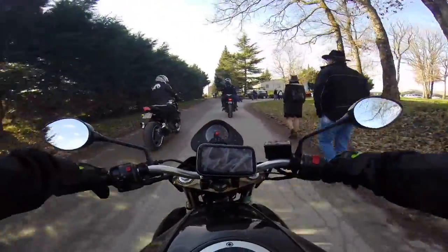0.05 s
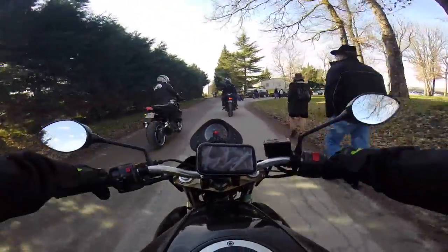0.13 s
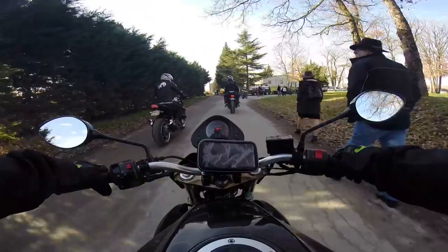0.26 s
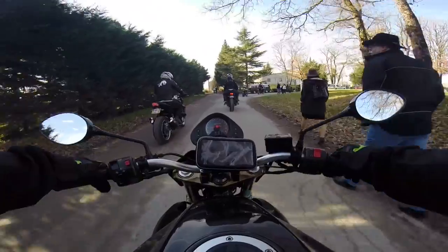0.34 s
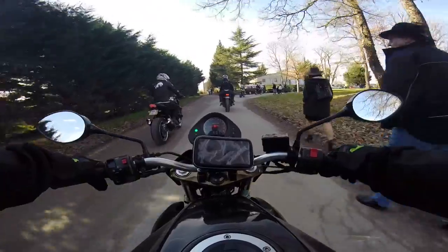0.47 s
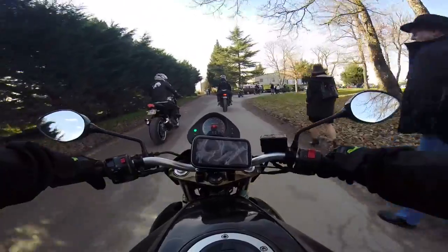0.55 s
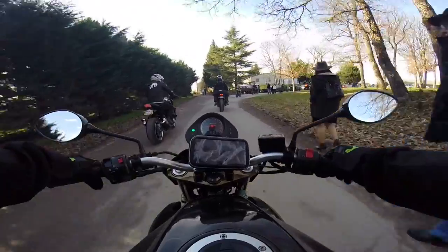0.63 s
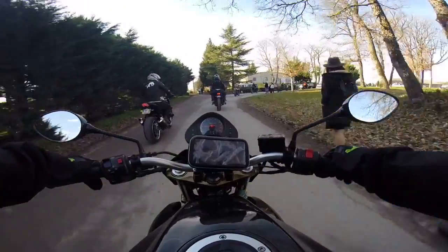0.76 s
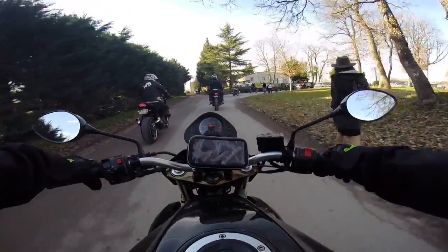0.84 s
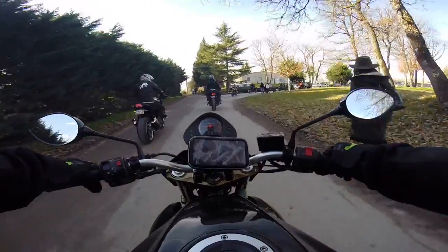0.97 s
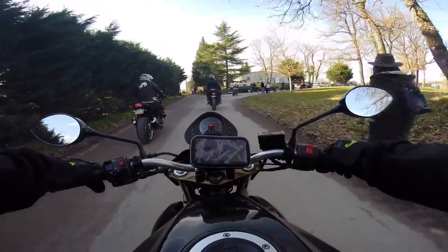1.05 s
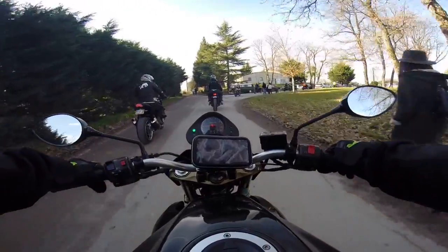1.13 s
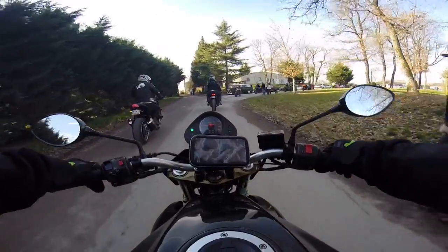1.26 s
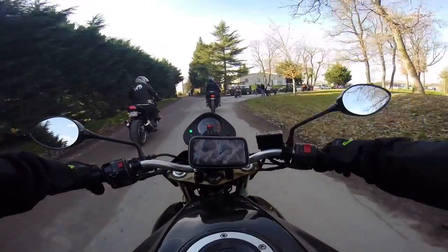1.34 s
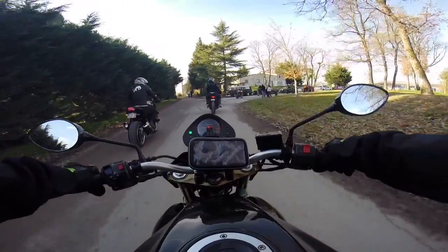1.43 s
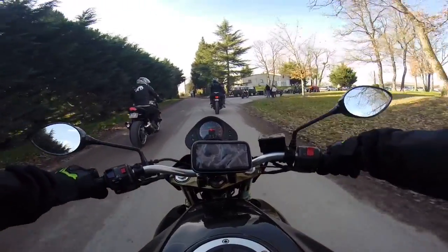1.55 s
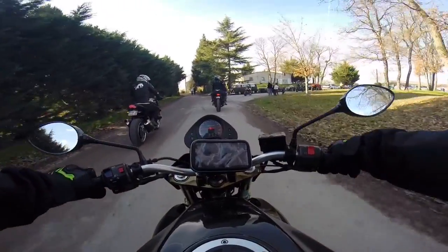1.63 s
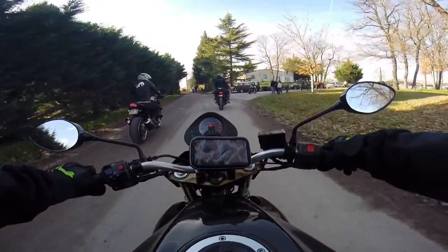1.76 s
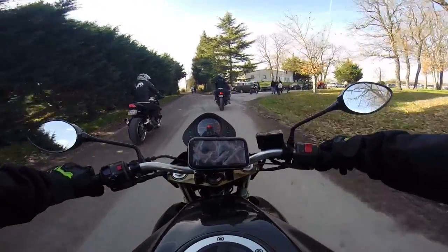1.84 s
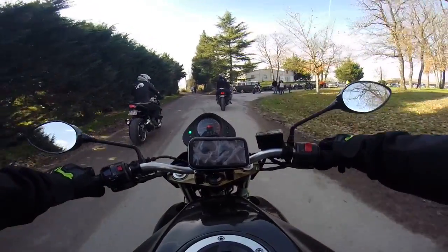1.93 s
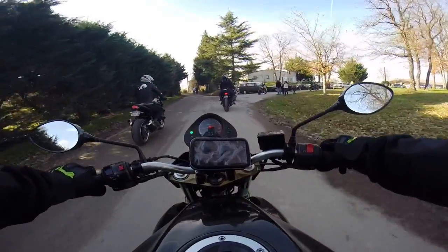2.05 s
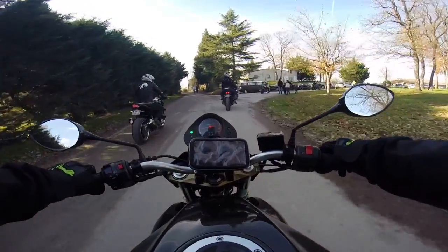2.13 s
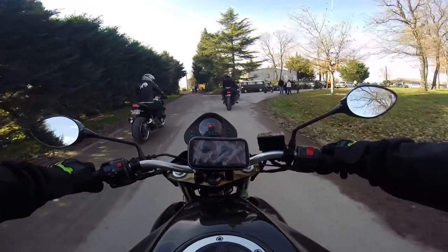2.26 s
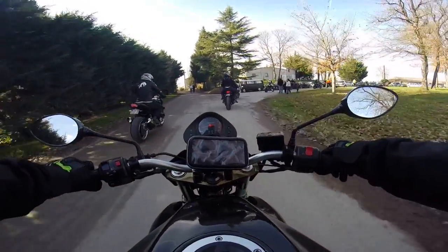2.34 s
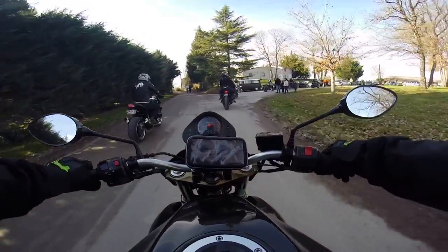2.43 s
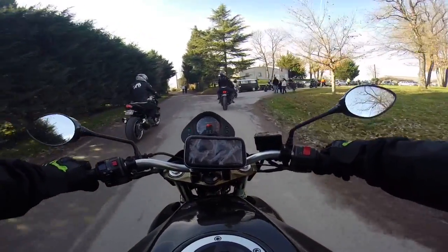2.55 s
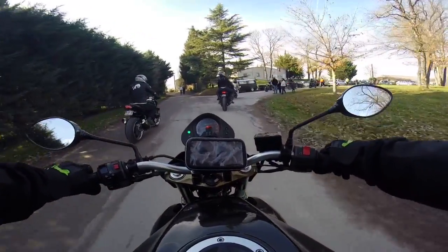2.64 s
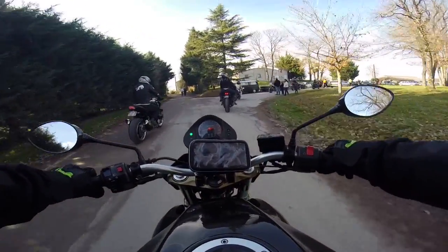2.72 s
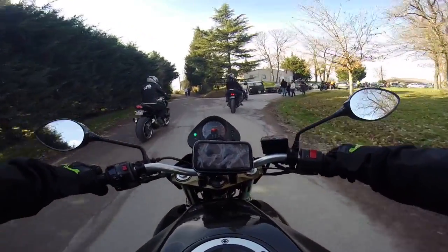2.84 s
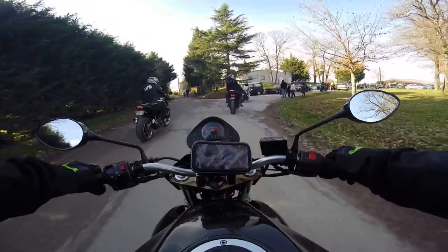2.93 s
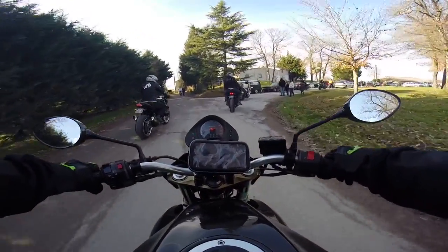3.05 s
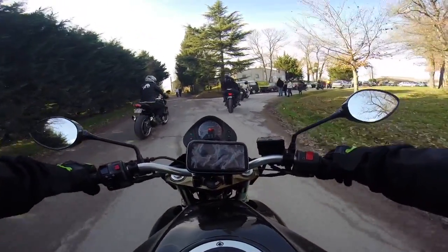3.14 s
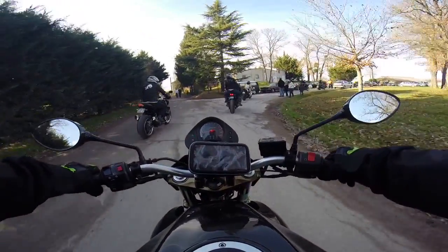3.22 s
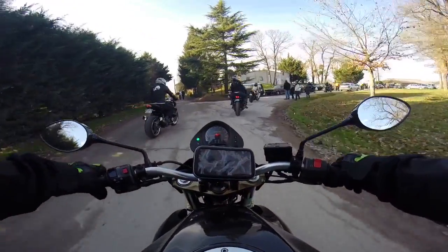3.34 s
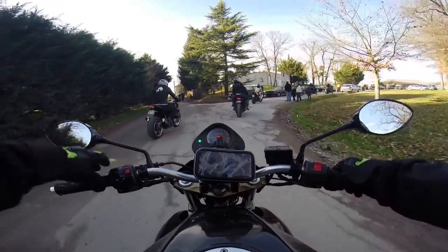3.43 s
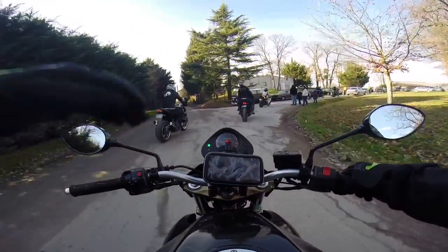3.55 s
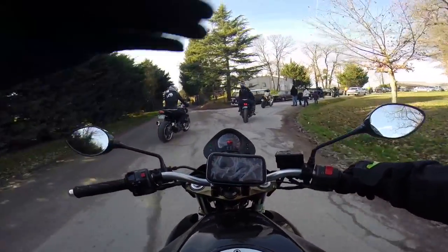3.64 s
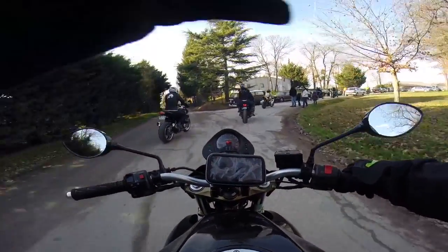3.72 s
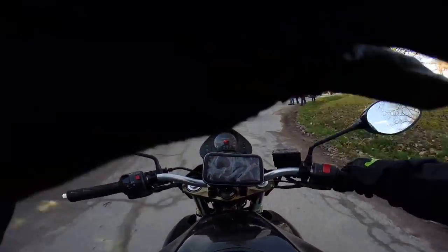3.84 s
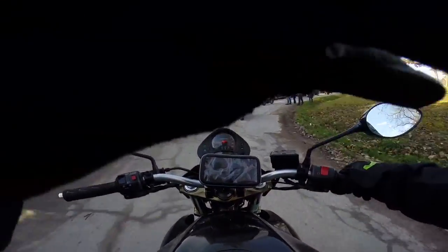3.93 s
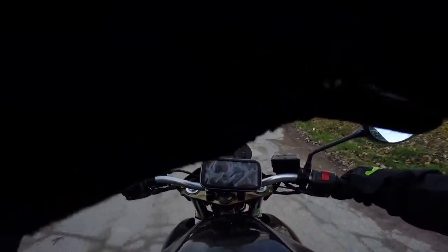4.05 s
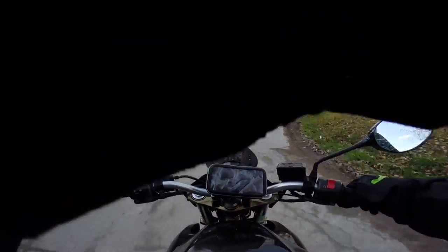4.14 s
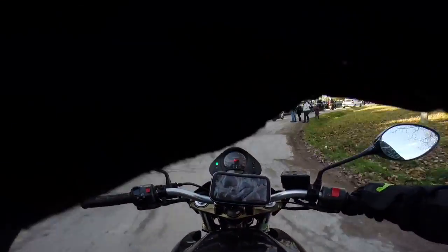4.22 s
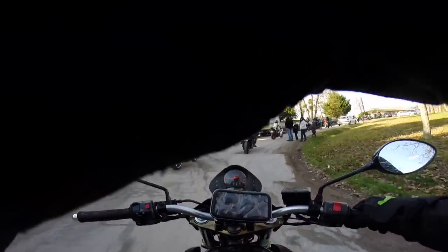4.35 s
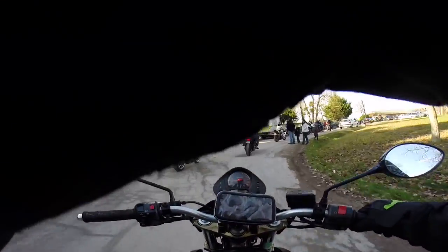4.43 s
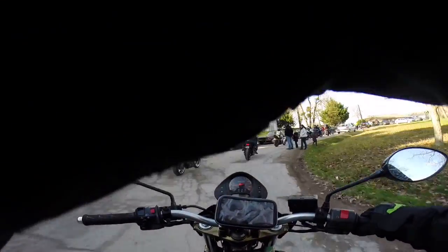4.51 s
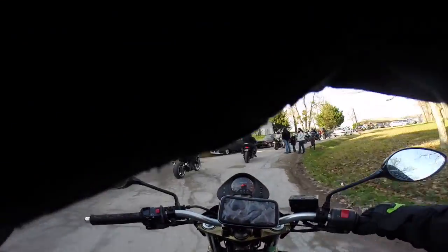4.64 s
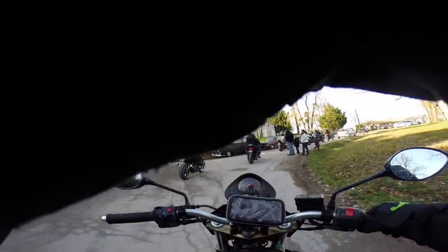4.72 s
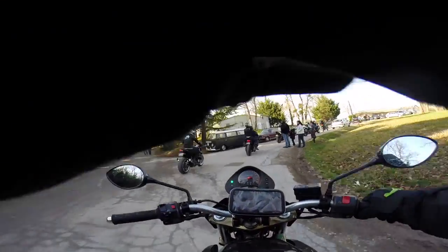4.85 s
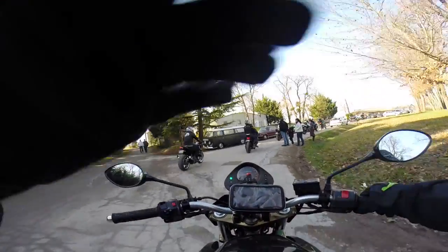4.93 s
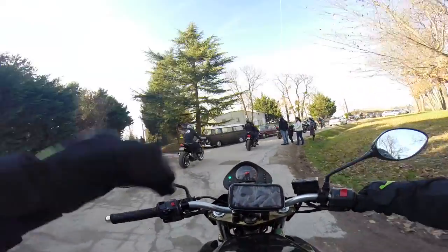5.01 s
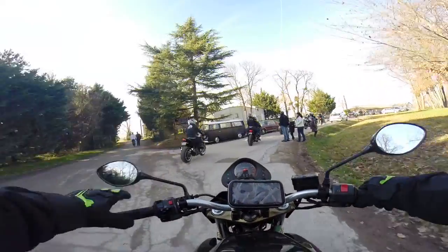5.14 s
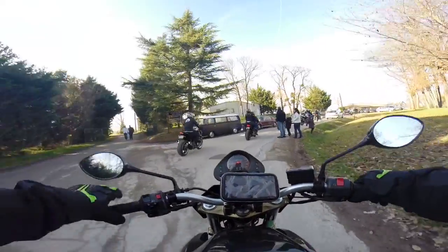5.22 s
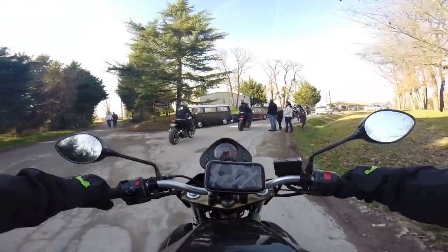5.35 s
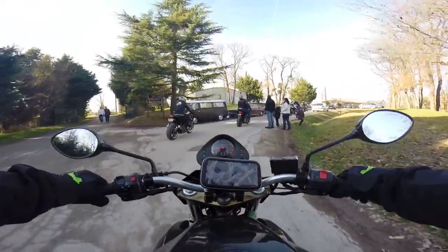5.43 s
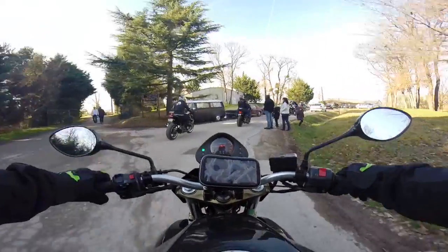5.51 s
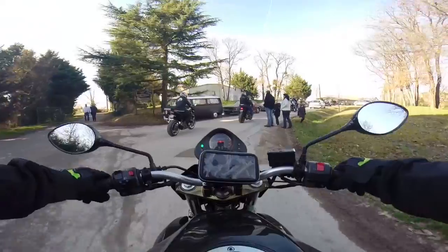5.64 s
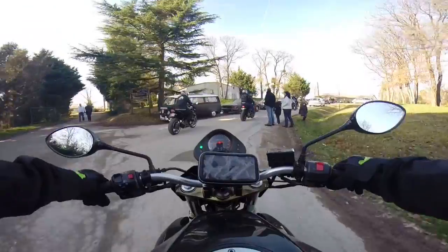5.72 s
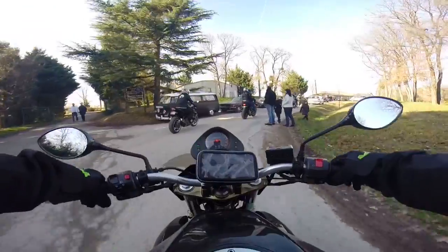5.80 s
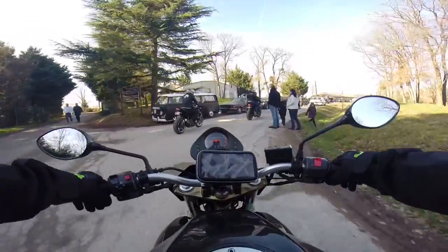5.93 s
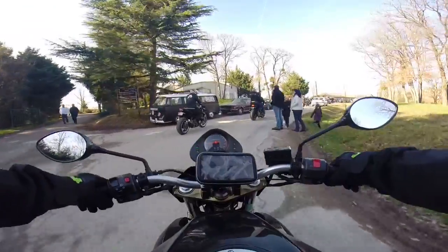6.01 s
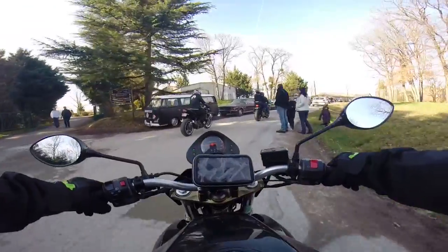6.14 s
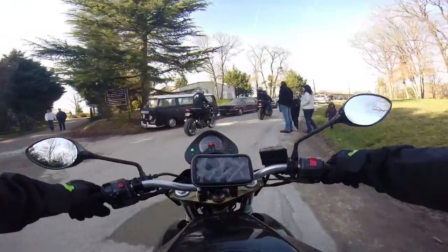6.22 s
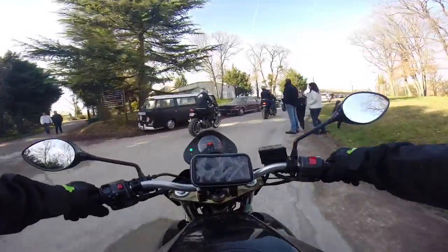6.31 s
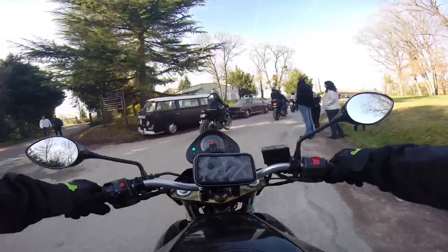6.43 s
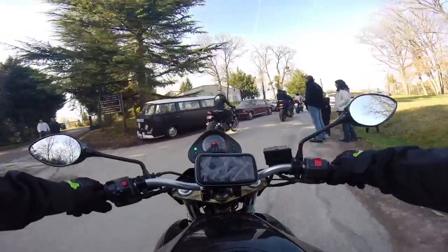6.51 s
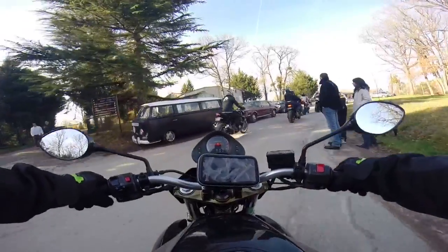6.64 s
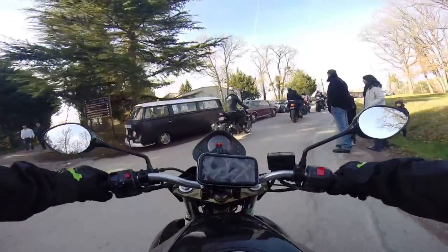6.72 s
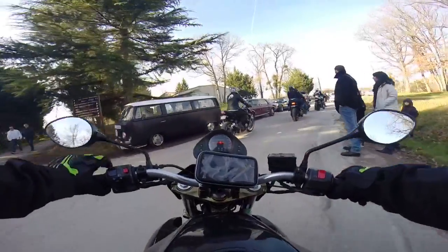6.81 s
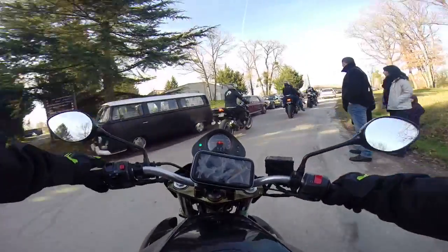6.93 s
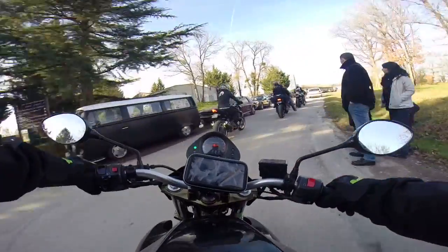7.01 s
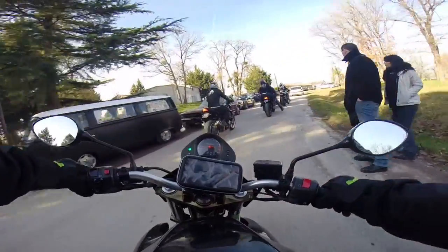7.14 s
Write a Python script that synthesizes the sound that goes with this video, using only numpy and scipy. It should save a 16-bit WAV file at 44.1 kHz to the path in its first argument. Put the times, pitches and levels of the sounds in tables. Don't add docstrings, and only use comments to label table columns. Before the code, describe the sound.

Outdoor slow riding, heard very close through a plastic camera housing. Wind flutters and slaps over two humming engines with ticking valves. Sleeve rustles lead to heavy glove contact: overloaded bumps, sharp plastic cracks, a short scrape and a double button click, all over muffled wind. Creaks and small ticks follow as the hand leaves, then the rider's engine revs briefly while another bike hums further on.

```python
import sys
import numpy as np
from scipy import signal
from scipy.fft import rfft, irfft
from scipy.io import wavfile
from scipy.ndimage import uniform_filter1d

SR = 44100
rng = np.random.default_rng(int(sys.argv[2]) if len(sys.argv) > 2 else 0)


def convert_level_to_amplitude(level_db):
    exponent = np.asarray(level_db, float) / 20
    return 10 ** exponent


def pcm_store(signal):
    levels = np.round(np.clip(np.atleast_2d(signal), -1, 1) * 32767)
    wavfile.write(sys.argv[1], SR, levels.astype(np.int16).T)


N = 316197

CYLINDER_LEVELS = [0, -11.5, 2, -1]
# time in seconds, firing rate in Hz.
FOUR_SPEED = [(0, 51.5), (1, 50.8), (2.1, 52), (2.6, 49.5), (3.1, 52), (3.8, 62), (5.2, 60), (5.6, 62.8),
              (5.85, 61.5), (6.1, 68), (6.55, 69), (6.8, 62), (7.17, 60)]
# time in seconds, exhaust level in dB.
THROTTLE = [
    (0, -28.5),
    (.5, -40),
    (1, -29),
    (3.9, -31),
    (5.3, -34.5),
    (5.65, -29.5),
    (5.95, -31),
    (6.15, -26),
    (6.6, -29.5),
]
# frequency in Hz, level in dB.
SILENCER = [(25, -24.5), (50, 2.5), (70, -4), (90, -9), (125, -3.5), (170, -14), (250, -15.5), (330, -16.5),
            (420, -30.5), (800, -46.5), (3000, -60), (16000, -110)]
# time in seconds, firing note in dB, its octave in dB.
FOUR_NOTE = [(0, -37, -54), (1, -41, -41), (2.1, -35, -44), (2.7, -41, -48), (3.2, -34, -49.5),
             (3.8, -41, -52), (3.95, -55, -57.5), (5.35, -56, -48), (5.65, -40, -34.5), (5.9, -47, -39),
             (6.05, -45, -45), (6.4, -35, -39.5), (6.6, -36, -43.5), (6.9, -46, -51), (7.02, -44, -33.5),
             (7.17, -42, -34)]
# time in seconds, cycle rate in Hz.
TWIN_SPEED = [(0, 13.8), (.3, 14.1), (.61, 15.05), (.72, 15.4), (1.05, 16.3), (1.49, 18), (1.64, 19.2),
              (1.84, 20.7), (2.03, 20.9), (2.14, 20.7), (2.31, 21.2), (2.6, 22.6), (2.9, 24.2), (3.1, 24),
              (3.3, 22.8), (3.8, 24)]
# time in seconds, exhaust level in dB.
TWIN_LEVEL = [
    (0, -35),
    (.4, -24.5),
    (.8, -47),
    (1.1, -29),
    (1.65, -45),
    (1.9, -34),
    (2.3, -33),
    (3.8, -36),
    (3.9, -58),
]
# frequency in Hz, level in dB.
TWIN_EXHAUST = [(25, -40), (50, -2.5), (120, -0.5), (250, -8), (330, -5.5), (420, -29), (800, -48.5),
                (3000, -65), (16000, -110)]
# multiple of the cycle rate, level in dB.
TWIN_ORDERS = [(3, -47), (4, -39.5), (5, -44), (6, -40.5), (7, -45.5), (8, -42), (10, -46.5), (12, -44),
               (16, -51.5), (20, -56.5), (24, -55)]
# time in seconds, gain in dB.
TWIN_HUM_GAIN = [(0, -3), (.9, 0), (1.5, -2.5), (2.1, 3), (2.8, -0.5), (3.3, -4.5), (3.85, -2.5),
                 (3.95, -44)]
# time in seconds, buffeting in dB.
GUSTS = [(0, -26.5), (.54, -29), (.77, -28), (1.05, -27.5), (1.6, -29.5), (2.4, -32), (3.35, -29.5),
         (3.86, -29.5), (3.92, -34.5), (4.2, -27.5), (4.36, -26.5), (4.6, -30.5), (5.25, -34), (5.74, -27),
         (6.04, -27.5), (6.2, -25.5), (6.78, -26.5), (7.17, -27)]
# frequency in Hz, level in dB per Hz.
BUFFET_TONE = [(5, -2), (15, -12), (30, -5.5), (60, -0.5), (250, -5.5), (400, -17.5), (800, -33.5),
               (1500, -43.5)]
# frequency in Hz, level in dB per Hz.
HISS_TONE = [(400, 1.5), (850, -2), (1300, -2.5), (2000, 0), (4300, -5), (5000, -9), (7000, -16),
             (8400, -25.5), (13500, -34.5), (15200, -38), (15800, -65)]
# frequency in Hz, width in Hz, level in dB.
HOUSING = [(1107, 64, -7), (1507, 130, -4), (2180, 170, -10), (2750, 200, -13), (4150, 300, -13),
           (5500, 220, -20), (6500, 130, -26), (9430, 300, -30)]
# time in seconds, loss in dB.
COVER = [
    (4.38, -5.5),
    (4.46, -30),
    (4.52, -16),
    (4.614, -26),
    (4.77, -18),
    (4.96, -8.5),
    (5.08, -11.5),
    (5.3, -6.5),
    (5.55, -6),
]
# time in seconds, peak in dB, pitch in Hz.
SLAPS = [(0.675, -18, 131), (0.702, -17.5, 153), (0.721, -17, 119), (0.737, -17, 130), (0.751, -11, 200),
         (0.763, -12.5, 203), (.774, -17, 170), (0.783, -19, 199), (0.801, -16, 131), (0.827, -14, 178),
         (.840, -17, 230), (.844, -26, 630), (.860, -16, 198), (0.876, -25, 556), (0.875, -14.5, 174),
         (1.162, -17, 108), (1.764, -18, 110), (2.005, -19, 116), (2.648, -15, 173), (5.438, -20, 244),
         (5.574, -16.5, 205), (6.84, -19.5, 270), (6.87, -21.5, 280), (7.0, -22.5, 250), (3.235, -15, 120),
         (3.25, -16.5, 125), (3.36, -22, 135), (3.49, -21, 149), (3.42, -20, 149), (3.471, -25, 150.2),
         (5.587, -15, 140), (5.602, -15, 238)]
# middle and length in seconds, level in dB, hollow in Hz, its low part in dB.
RUSTLES = [(0.856, 0.066, -42, 4270, -4), (1.872, 0.084, -48.5, 2330, 0.5), (3.33, 0.14, -47.5, 2300, -6),
           (3.415, 0.1, -41, 3800, -3), (3.483, 0.057, -49, 3800, -8), (3.62, 0.15, -46, 2500, -1),
           (5.199, 0.052, -50, 2470, -1), (5.383, 0.21, -46.5, 2170, -4), (5.464, 0.04, -42, 1940, -12),
           (5.63, 0.097, -32.5, 2560, -4), (5.787, 0.33, -54, 2310, 5.5), (6.129, 0.06, -37.5, 2760, -1.5),
           (6.176, 0.064, -44, 2200, -3), (6.332, 0.055, -39.5, 2400, -6), (6.385, 0.045, -48, 2420, 1),
           (6.592, 0.055, -44.5, 2460, 4), (6.683, 0.069, -43.5, 2700, 1), (6.748, 0.06, -39.5, 2600, 2),
           (6.85, 0.045, -43, 2600, 0), (6.903, 0.052, -41, 2500, -0.5), (6.95, 0.037, -47.5, 2300, -1)]
# middle and length in seconds, level in dB, hollow in Hz, bright part in dB.
RUBS = [
    (3.927, 0.023, -22, 2870, 6.5),
    (3.978, 0.05, -39.5, 2450, -3),
    (4.071, 0.094, -29, 3540, 1),
    (4.166, 0.12, -54, 2380, -5),
    (4.253, 0.18, -46, 2320, -16),
    (4.36, 0.035, -36.5, 2360, -20),
    (3.911, 0.011, -33, 2400, 2),
    (4.554, 0.04, -55.5, 2520, -19),
    (4.92, 0.045, -29, 2750, -7.5),
]
# frequency in Hz, level in dB.
CASE_TONE = [(300, -30), (600, -2.5), (1000, 2.5), (1600, 6.5), (7000, -8.5), (8500, -11), (12000, -20.5),
             (15000, -27)]
# time in seconds, peak in dB, pitch in Hz.
SQUEAKS = [(0.8412, -38, 5700), (0.8612, -39, 4250), (0.8612, -40, 5400), (1.8468, -45, 3900),
           (1.8652, -39, 3850), (3.3747, -36, 3770), (3.388, -42, 4000), (3.409, -36, 3840),
           (3.415, -35, 3950), (3.424, -33.5, 3880), (3.4724, -38, 3870), (3.5004, -40, 4200),
           (4.3405, -54, 11500), (4.3645, -49, 11500), (4.386, -41, 11500)]
# time in seconds, peak in dB, pitch in Hz.
CREAKS = [(3.409, -36, 615), (3.474, -47, 640), (4.447, -28, 2110), (4.454, -36, 1410),
          (4.462, -21.5, 2900), (4.594, -50, 2700), (5.628, -22, 2750), (5.660, -25, 2750),
          (5.98, -36, 1090), (6.035, -33, 1100), (6.21, -35, 2150), (6.29, -35, 2150), (6.1115, -34, 1360),
          (6.1234, -30, 1520), (6.128, -30, 2800), (6.308, -31, 2060), (6.6742, -32, 1450),
          (6.736, -32, 1454), (6.8473, -33, 1580), (5.3432, -32, 2300), (5.3757, -27.5, 2100),
          (5.436, -30, 2090), (5.4545, -30, 1500), (5.466, -29, 2300), (5.4769, -24.5, 1970),
          (5.5238, -42, 1540), (5.546, -41, 1540), (5.6030, -34, 1400), (5.6371, -27, 1540),
          (5.640, -27, 2420), (5.648, -26, 2080), (5.656, -34, 1520), (5.669, -29, 2080)]
# start and length in seconds, first and last Hz, level in dB.
WHISTLES = [
    (1.15, .5, 1105, 1095, -60),
    (3.1, .8, 1110, 1105, -54.5),
    (4.96, .23, 5050, 4950, -64.5),
    (5.24, .03, 5020, 5030, -60),
    (5.295, .03, 5080, 5140, -56),
    (5.36, .13, 5350, 5300, -61),
]
# time in seconds, pitch in Hz, level in dB.
LEAVING_BIKE = [
    (3.15, 122, -65),
    (3.25, 125, -36),
    (3.35, 132.1, -40),
    (3.48, 148, -35),
    (3.6, 146, -44),
    (3.7, 140, -65),
]
# time in seconds, pitch in Hz, level in dB.
WAITING_BIKE = [
    (4.6, 163.3, -70.5),
    (4.75, 163.3, -50.5),
    (5.2, 157.3, -45),
    (5.4, 162.6, -41.5),
    (5.85, 165.3, -37),
    (6.0, 163, -60),
]
# time in seconds, pitch in Hz, level in dB.
FAR_BIKE = [
    (5.5, 76, -62),
    (5.75, 78.5, -64),
    (6.15, 85.75, -25.5),
    (6.5, 85.4, -38),
    (7.17, 92.7, -43),
]
# time in seconds, peak in dB, ring in Hz, top in dB.
CLICKS = [(3.318, -23.5, 1900, -31), (3.9039, -18.5, 1620, -50), (3.944, -16.5, 1580, -36),
          (4.216, -12, 3720, -19), (4.2834, -28, 2300, -24), (4.3205, -29, 1300, -50),
          (4.357, -12, 2520, -21.5), (4.377, -18, 2500, -22), (4.387, -24, 2520, -23),
          (4.406, -27, 3600, -26), (4.5441, -40, 2390, -43), (4.594, -46, 2700, -32),
          (4.5754, -29, 1500, -32), (4.6165, -41, 1700, -45), (4.4022, -26, 1600, -55),
          (5.6181, -12, 2300, -45)]
# time in seconds, pressure, rise in ms, fall in ms.
PUSHES = [(3.902, 0.24, 3.3, 4), (3.912, -0.28, 1.3, 4.2), (3.925, 0.91, 5.5, 13), (3.934, -0.35, 5.4, 21),
          (3.940, -0.48, 1.4, 0.62), (3.943, -0.77, 0.33, 1.1), (3.95, -0.3, 7.5, 6.8),
          (4.192, -0.21, 6.6, 3), (4.2081, -0.39, 0.47, 2.2), (4.322, -0.17, 1.4, 0.43),
          (4.338, -0.38, 14.6, 15), (4.4038, -0.33, 0.6, 1.9), (4.4056, -1.1, 1.1, 1.77),
          (4.408, -0.28, 1.5, 2.8), (4.5738, -0.23, 2.7, 1.6), (4.5757, -1.96, 0.97, 1.27),
          (4.887, 0.21, 8.3, 17), (4.952, -0.14, 5, 3.8)]
# time in seconds, level in dB.
SQUEEZE = [
    (3.95, -60),
    (4.034, -29.5),
    (4.4, -37),
    (4.47, -27),
    (4.62, -45.5),
    (4.828, -37),
    (5.05, -46),
]
# time in seconds, peak
# in dB.
FIBRE_TICKS = [
    (4.196, -51),
    (4.3004, -48),
    (4.351, -52.5),
               (5.1892, -68), (5.206, -47), (5.2503, -61), (5.2755, -55), (5.3379, -59), (5.3618, -58),
              (5.3753, -57), (5.3953, -50), (5.4242, -52), (5.4611, -47), (5.5863, -50), (5.6178, -53),
              (5.6178, -45), (5.6741, -44),
               (5.7173, -55), (5.7966, -52), (5.9647, -53), (6.1164, -46), (6.2606, -55), (6.3235, -42),
                (6.6958, -50), (6.8558, -48), (6.8812, -50)]
# (time in seconds, peak in dB), then rows of Hz, dB, t60 in seconds.
SNAPS = [
    ((4.2158, -3.5), [(1443, -14.5, .01), (2270, -5, 0.0076), (3500, 0.5, 0.0068), (4452, -12.5, 0.0092), (5580, -1.5, .0052), (7740, -8.5, .005), (9572, -14, 0.0035), (12480, -13.5, 0.0029), (15000, -24, .003)]),
    ((4.2832, -16), [(2230, 0.5, .006), (5000, -3, 0.0066), (7817, -13, .006), (11800, -24, .005)]),
    ((4.3568, -7), [(1970, -4, 0.0072), (2700, 4.5, .004), (3400, -3, .004), (4240, -3.5, 0.0056), (6300, -8.5, 0.0046), (8300, -15, .005), (9512, -16, .004), (11800, -11, 0.0034), (13800, -15, .003)]),
    ((4.3762, -13.5), [(2030, -5, .012), (3000, 3, .007), (4280, -7, .01), (6400, -14, .006), (8376, -18, .006), (11490, -18, .005), (14000, -20, .005)]),
]
# time in seconds, level in dB.
SCRAPE = [
    (4.419, -70),
    (4.428, -44),
    (4.445, -35.5),
    (4.463, -33),
    (4.47, -41),
    (4.479, -42),
    (4.49, -70.5),
]
# frequency in Hz, width in Hz, level in dB.
SCRAPE_HOLLOWS = [(1560, 430, -4.5), (2050, 500, -4), (2750, 800, 1.5), (3230, 270, -6.5),
                  (4600, 500, -12.5), (7200, 1300, -19)]
# frequency in Hz, level in dB, t60 in seconds.
BUTTON_MODES = [(1300, -22, 0.011), (1970, -4.5, 0.0089), (2980, -10, 0.0078), (3780, 7.5, 0.0037),
                (5150, 1, 0.0056), (7300, -16, 0.0093), (8350, -14, 0.0086), (9400, -5.5, 0.0035),
                (10700, -11, 0.0037), (12830, -19, .005)]
# time in seconds, peak in dB.
PRESSES = [
    (4.7300, -16.5),
    (4.7628, -16.5),
]


def columns(rows):
    s, *cols = np.transpose(rows)
    return [np.interp(np.arange(N) / SR, s, c) for c in cols]


def unit(x):
    return x / np.sqrt(np.mean(x ** 2))


def gain_db(hz, points):
    return np.interp(np.log(hz), np.log([p[0] for p in points]), [p[1] for p in points])


def colour(x, points):
    hz = np.maximum(np.linspace(0, SR / 2, num=4097), 1)
    cep = irfft(np.log(convert_level_to_amplitude(gain_db(hz, points))))
    cep[1:4096] *= 2
    cep[4097:] = 0
    response = irfft(np.exp(rfft(cep)))
    return signal.fftconvolve(x, response)[:len(x)]


def ring(x, hz, width):
    return signal.lfilter(*signal.iirpeak(hz, hz / width, fs=SR), x)


def steep(x, hz, width):
    return ring(ring(x, hz, width), hz, width)


def walk(rate):
    k = int(SR / rate)
    held = np.repeat(rng.standard_normal(N // k + 1), k)
    return 1.33 * uniform_filter1d(uniform_filter1d(held, k), k)[:N]


def waver(x):
    delay_s = .0009
    return np.interp(np.arange(N) + delay_s * SR * walk(12), np.arange(N), x)


def cover():
    return columns(COVER)[0]


def firings(phase, pattern_db, scatter_db):
    at = np.flatnonzero(np.diff(np.floor(phase)))
    scatter = scatter_db * rng.standard_normal(N // 100)[:len(at)]
    pulses = np.zeros(N)
    pulses[at] = convert_level_to_amplitude(np.resize(pattern_db, len(at)) + scatter)
    return pulses


def clatter(cycle, steady):
    turn = cycle % 1 / .12
    knock = 30 * firings(cycle, [0], 1.5)
    puff = steady + turn * np.exp(1 - turn)
    burst = knock + puff * convert_level_to_amplitude(walk(25)) * rng.standard_normal(N)
    rattle = steep(burst, 1490, 85) + .5 * steep(np.roll(burst, 200), 1565, 85)
    rattle = rattle + .17 * steep(np.roll(burst, 500), 2170, 160)
    return unit(rattle + .3 * steep(np.roll(burst, 1300), 1105, 100))


def four():
    (hz,), (db,) = columns(FOUR_SPEED), columns(THROTTLE)
    phase = np.cumsum(hz * (1 + .008 * walk(30))) / SR
    pipe = unit(colour(firings(phase, CYLINDER_LEVELS, 2.2), SILENCER))
    clatter_db = -41.5 + 1.4 * np.minimum(hz - 65.3, 0) + 1.5 * cover()
    valves = waver(clatter(phase / len(CYLINDER_LEVELS), 0.8))
    note = 0
    for k, level_db in enumerate(columns(FOUR_NOTE), start=1):
        note = note + convert_level_to_amplitude(level_db) * np.sin(2 * np.pi * k * phase)
    engine_share = 0.97
    return convert_level_to_amplitude(db + engine_share * cover()) * pipe + convert_level_to_amplitude(clatter_db) * valves + note


def hum(phase, hz):
    total, top_hz, waver_db = 0, 325, 1.5
    for k, db in TWIN_ORDERS:
        level = convert_level_to_amplitude(db + waver_db * walk(4.15)) / (1 + (k * hz / top_hz) ** 6)
        total = total + level * np.sin(2 * np.pi * k * phase + k * k)
    return convert_level_to_amplitude(columns(TWIN_HUM_GAIN)[0] + 2.5) * total


def twin():
    (hz,), (db,) = columns(TWIN_SPEED), columns(TWIN_LEVEL)
    second_gap, second_db = 0.3804, -6
    abreast_s, clatter_s = 1.5, 1.407
    since = np.arange(N) / SR - abreast_s
    clatter_db = -46.5 + np.minimum(4.5 * since, -10.5 * since)
    phase = np.cumsum(hz * (1 + .004 * walk(15))) / SR
    phase -= phase[int(clatter_s * SR)]
    pulses = firings(phase - .1, [0], 1.5) + firings(phase - .1 - second_gap, [second_db], 1.5)
    pipe = unit(colour(pulses, TWIN_EXHAUST))
    valves = waver(clatter(phase + 0.16, 0.05))
    return convert_level_to_amplitude(db - 7.0) * pipe + hum(phase, hz) + convert_level_to_amplitude(clatter_db) * valves


def bands(points, shared_db, own_db, rate):
    out, swell = 0, shared_db * walk(rate)
    octaves = np.log2(points[-1][0] / points[0][0])
    for hz in points[0][0] * 2 ** np.arange(0, octaves, .5):
        sos = signal.butter(2, [hz / 2 ** .25, hz * 2 ** .25], "band", fs=SR, output="sos")
        out = out + convert_level_to_amplitude(swell + own_db * walk(rate)) * signal.sosfilt(sos, rng.standard_normal(N))
    return unit(colour(out, points))


def housing(x):
    return x + sum(convert_level_to_amplitude(db - gain_db(hz, HISS_TONE) + 6.0) * ring(x, hz, w) for hz, w, db in HOUSING)


def wind():
    (gust_db,), loss_db = columns(GUSTS), cover()
    bass_share, top_share, top_hz = 0.74, 0.89, 7100
    buffet = bands(BUFFET_TONE, 1.2, 1.6, 30)
    hiss = unit(housing(bands(HISS_TONE, 0.75, 0.63, 30)))
    dull = signal.sosfilt(signal.butter(2, top_hz, fs=SR, output="sos"), hiss)
    shade_db = -5.5 * (np.digitize(np.arange(N) / SR, (3.9, 5.3)) == 1)
    hiss = convert_level_to_amplitude(loss_db) * dull + convert_level_to_amplitude(top_share * loss_db + shade_db) * (hiss - dull)
    hiss_db = -43 + 0.66 * (gust_db + 34.5)
    return convert_level_to_amplitude(gust_db - 1.0 + bass_share * loss_db) * buffet + convert_level_to_amplitude(hiss_db) * hiss


def slaps():
    out, t = np.zeros(N), np.arange(SR // 30) / SR
    for s, db, hz in SLAPS:
        i = int(s * SR)
        swell = t * hz * np.exp(-t * hz / 0.37)
        out[i:i + len(t)] += convert_level_to_amplitude(db + 14.5) * np.sin(2 * np.pi * hz * t) * swell
    return out


def rubs():
    grain = rng.standard_normal(N) * convert_level_to_amplitude(2.0 * walk(300))
    hollows = [1900, 2400, 3000, 3800, 4800]
    bodies = [unit(steep(grain, f, .27 * f)) for f in hollows]
    low = unit(steep(grain, 1650, 1330) + 2.5 * steep(grain, 590, 363))
    broad = unit(steep(grain, 3120, 3800))
    top = steep(grain, 5740, 2760) + 0.63 * steep(grain, 6240, 700)
    top = unit(top + 0.62 * steep(grain, 4070, 2400) + 0.31 * steep(grain, 9200, 6600))
    strokes = [(*r, -23) for r in RUSTLES]
    for s, length, db, hz, top_db in RUBS:
        low_db = -6 - 20.5 * np.log2(hz / 2400)
        strokes.append((s, length, db, hz, low_db, top_db))
    out = np.zeros(N)
    for s, length, db, hz, low_db, top_db in strokes:
        at = np.arange(int((s - length) * SR), int((s + length) * SR))
        swell_db = db - 11 * (2 * (at / SR - s) / length) ** 2
        body = sum(np.exp(-(np.log(hz / f) / .22) ** 2) * b[at] for f, b in zip(hollows, bodies))
        mix = 0.49 * body + 0.68 * broad[at] + convert_level_to_amplitude(low_db) * low[at] + convert_level_to_amplitude(top_db) * top[at]
        out[at] += convert_level_to_amplitude(swell_db) * mix
    return out


def slips(rows, cycles):
    out, t = np.zeros(N), np.arange(SR // 20) / SR
    for s, db, hz in rows:
        i = int(s * SR)
        x = t * hz / cycles * 2
        out[i:i + len(t)] += convert_level_to_amplitude(db) * x * np.exp(1 - x) * np.sin(2 * np.pi * hz * t)
    return out


def squeaks():
    return slips(SQUEAKS, 13)


def whistle():
    out, t = 0, np.arange(N) / SR
    breath_db, waver_hz, fade_s = 1.8 * walk(40), 20 * walk(150), 0.055
    for s, length, first_hz, last_hz, db in WHISTLES:
        hz = np.interp(t, [s, s + length], [first_hz, last_hz])
        fade = np.clip(np.minimum(t - s, s + length - t) / fade_s + .5, 0, 1)
        out = out + fade * convert_level_to_amplitude(db + breath_db) * np.sin(2 * np.pi * np.cumsum(hz + waver_hz) / SR)
    return out


def heave():
    middle_s, length_s = 2.28, 0.55
    swell = np.exp(-((np.arange(N) / SR - middle_s) / length_s) ** 2)
    return convert_level_to_amplitude(-37) * swell * unit(steep(rng.standard_normal(N), 33, 25))


def other_bikes():
    out, waver_db = 0, 1.8 * walk(6)
    for hz, db in map(columns, (LEAVING_BIKE, WAITING_BIKE, FAR_BIKE)):
        out = out + convert_level_to_amplitude(db - 0.5 + waver_db) * np.sin(2 * np.pi * np.cumsum(hz) / SR)
    return out


def clicks():
    out, t = np.zeros(N), np.arange(SR // 40) / SR
    t60_s, rise_s = 0.0096, 0.0011
    for s, db, hz, top_db in CLICKS:
        crackle = rng.standard_normal(len(t)) * np.exp(-np.log(1000) * t / t60_s)
        crack = 5.1 * (t == 0) + crackle * np.minimum(t / rise_s, 1)
        body = steep(crack, hz, 1.1 * hz) + .5 * steep(crack, 2200, 930)
        body = signal.lfilter(*signal.butter(2, [0.38 * hz, 1.74 * hz], "band", fs=SR), body)
        top = steep(crack, 5800, 8200) + 4.1 * steep(crack, 5350, 2600)
        both = body / np.abs(body).max() + convert_level_to_amplitude(top_db + 21.0) * top / np.abs(top).max()
        i = int(s * SR)
        out[i:i + len(t)] += convert_level_to_amplitude(db + 1.0) * both
    return out


def creaks():
    return slips(CREAKS, 3.6)


def pushes():
    db, = columns([(3.9, -90), *SQUEEZE, (5.1, -90)])
    out = convert_level_to_amplitude(db) * unit(ring(ring(rng.standard_normal(N), 14, 14), 20, 110))
    ms = np.arange(-2000, 2000) * 1000 / SR
    for s, size, rise_ms, fall_ms in PUSHES:
        i = int(s * SR)
        side_ms = np.where(ms < 0, rise_ms, fall_ms)
        out[i - 2000:i + 2000] += size * np.exp(-np.abs(ms / side_ms) ** 1.6)
    return out


def ticks():
    out, t = np.zeros(N), np.arange(SR // 200) / SR
    t60_s = .005
    for s, db in FIBRE_TICKS:
        burst = rng.standard_normal(len(t)) * np.exp(-np.log(1000) * t / t60_s)
        snap = steep(burst, 9300, 3600)
        i = int(s * SR)
        out[i:i + len(t)] += convert_level_to_amplitude(db - 1.0) * snap / np.abs(snap).max()
    return out


def shell_ring(modes):
    t = np.arange(SR // 40) / SR
    shell = sum(convert_level_to_amplitude(db - 60 * t / t60) * np.sin(2 * np.pi * hz * t) for hz, db, t60 in modes)
    shell = shell * (1 - np.exp(-t * 1000 / 0.29))
    return shell / np.abs(shell).max()


def shell_blows(blows):
    out = np.zeros(N)
    for (s, db), modes in blows:
        shell = shell_ring(modes)
        i = int(s * SR)
        out[i:i + len(shell)] += convert_level_to_amplitude(db) * shell
    return out


def snaps():
    return shell_blows(SNAPS)


def scrape():
    grain = rng.standard_normal(N) * convert_level_to_amplitude(2 * walk(400))
    hollows = sum(convert_level_to_amplitude(db) * unit(steep(grain, hz, w)) for hz, w, db in SCRAPE_HOLLOWS)
    return convert_level_to_amplitude(columns(SCRAPE)[0]) * unit(hollows)


def button():
    return shell_blows([(press, BUTTON_MODES) for press in PRESSES])


def scene():
    road = four() + twin() + wind() + slaps() + whistle() + heave() + other_bikes()
    leather = colour(rubs(), CASE_TONE) + squeaks() + creaks()
    touch = leather + clicks() + pushes() + ticks() + snaps() + scrape() + button()
    return (road + touch)[None]


def roll_off(x):
    return signal.sosfilt(signal.butter(12, 16500, fs=SR, output="sos"), x)


def record(dry):
    leak_s, overload, top_hz = .0095, 1.2, 15900
    keep = np.exp(-1 / (leak_s * SR))
    x = signal.lfilter([1, -1], [1, -keep], np.clip(dry, -overload, overload))
    x = signal.sosfilt(signal.ellip(8, .3, 60, top_hz, fs=SR, output="sos"), x)
    mix = np.clip(x, -1, 1)
    return roll_off(mix)


dry = scene()
out = record(dry)
pcm_store(out)
```